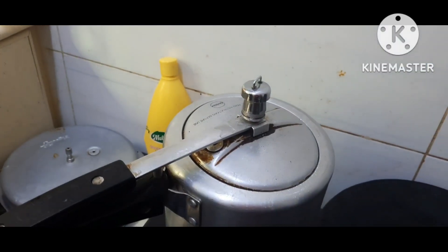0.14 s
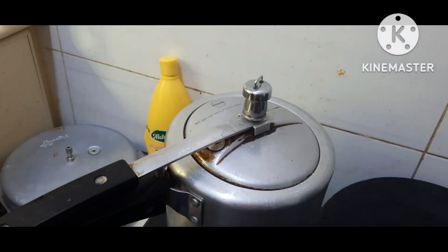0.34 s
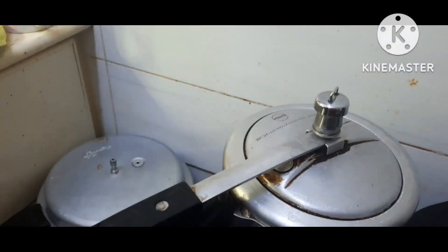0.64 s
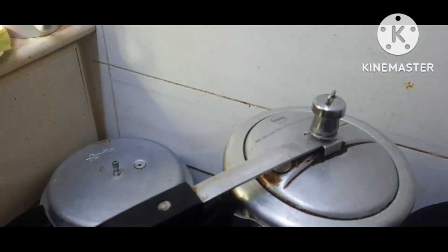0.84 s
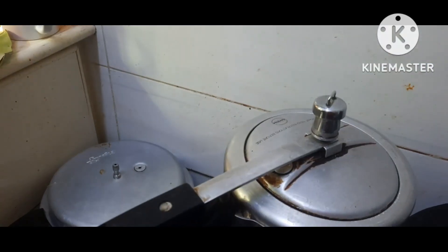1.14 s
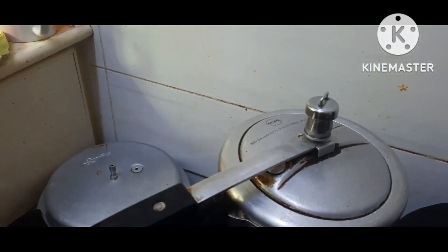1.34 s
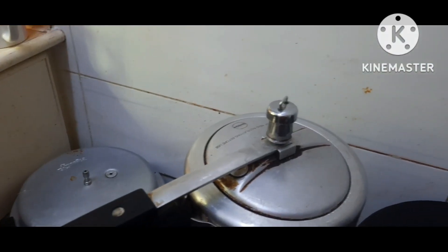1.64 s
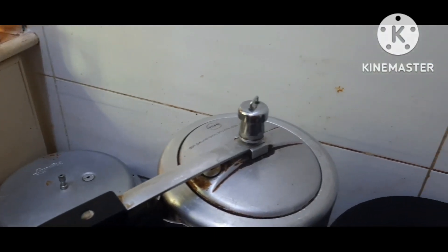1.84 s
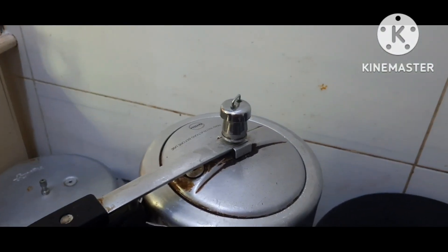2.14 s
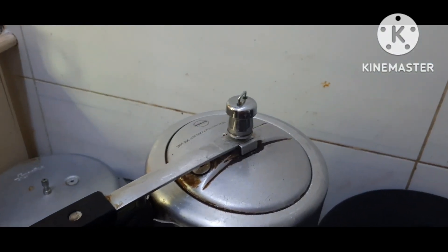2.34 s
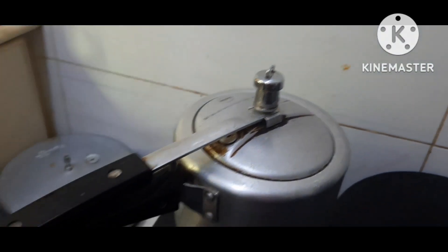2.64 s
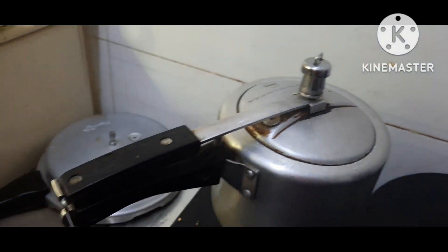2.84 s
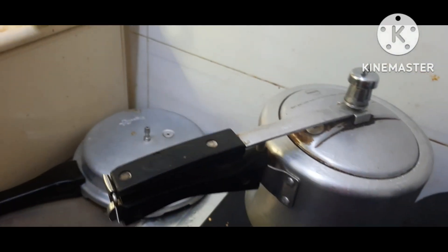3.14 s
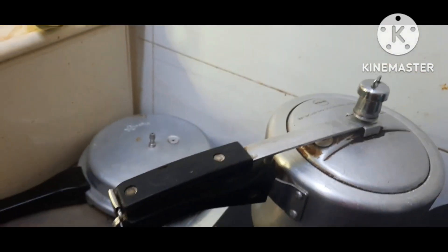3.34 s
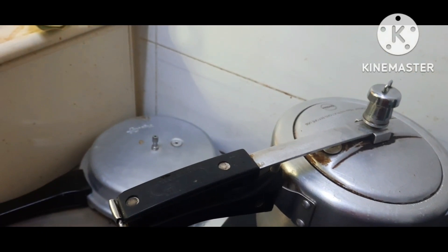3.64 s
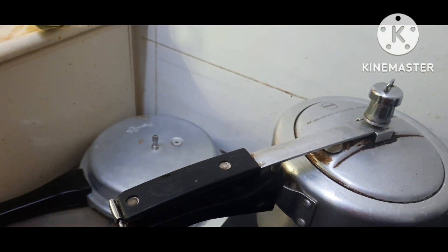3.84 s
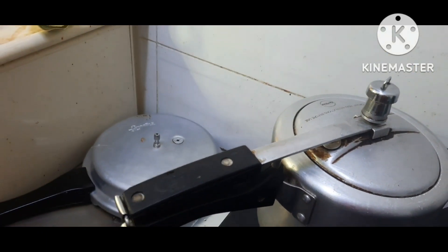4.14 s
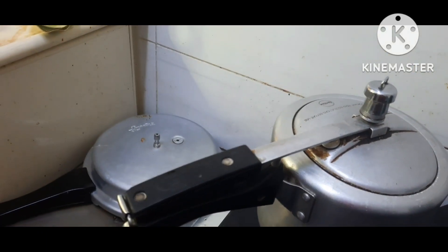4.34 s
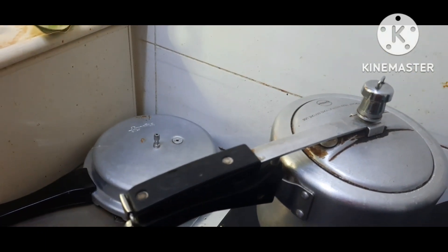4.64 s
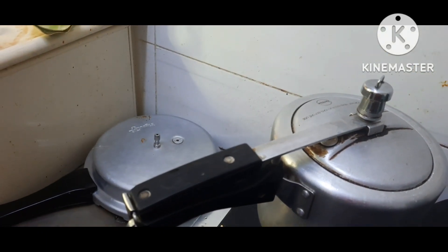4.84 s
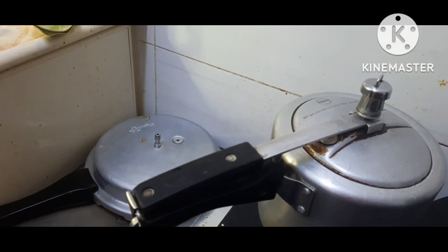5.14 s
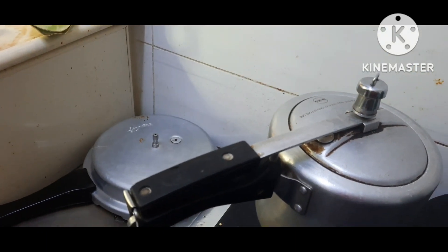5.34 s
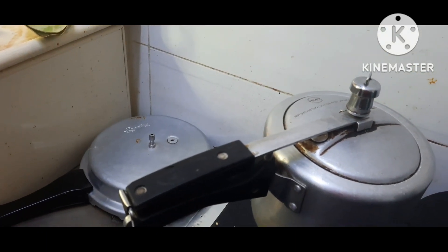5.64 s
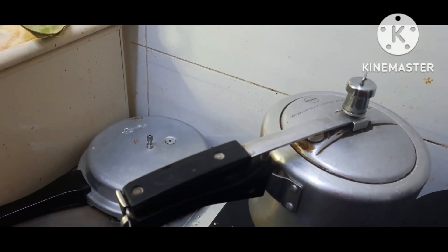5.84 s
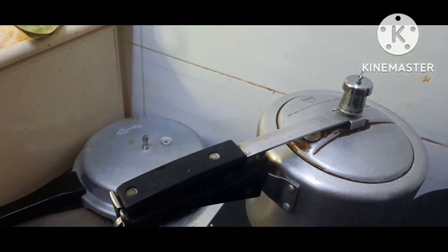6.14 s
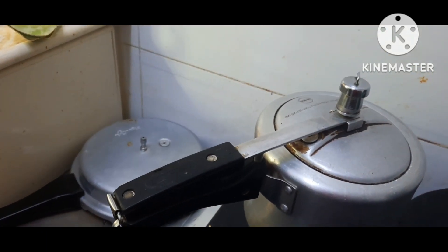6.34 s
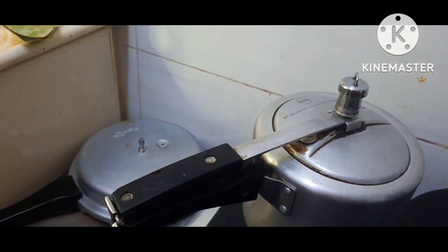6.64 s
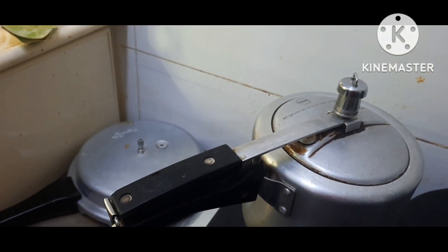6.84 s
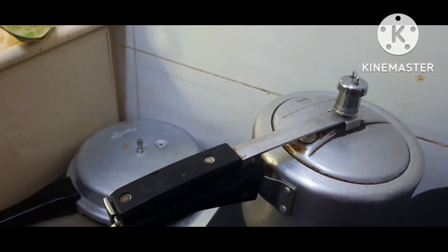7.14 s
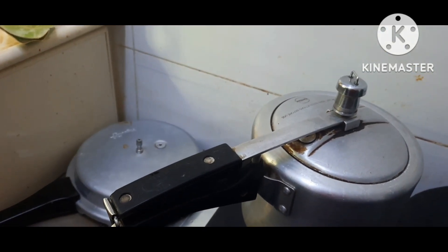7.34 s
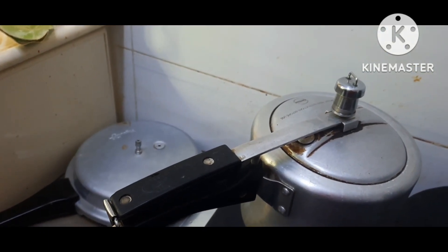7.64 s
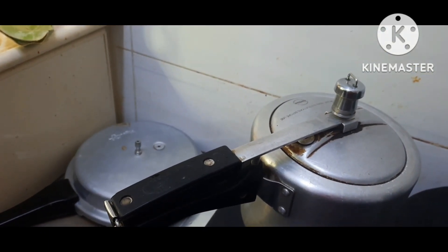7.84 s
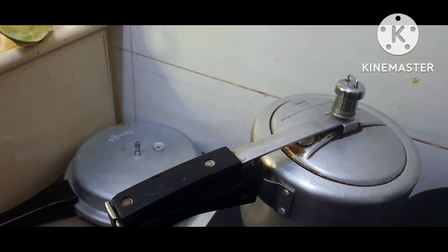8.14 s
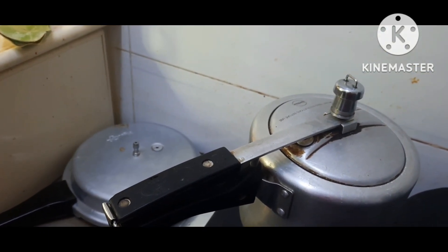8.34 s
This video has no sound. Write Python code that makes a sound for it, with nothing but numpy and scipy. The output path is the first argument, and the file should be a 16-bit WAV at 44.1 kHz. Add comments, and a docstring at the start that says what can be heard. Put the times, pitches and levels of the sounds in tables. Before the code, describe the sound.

A pressure cooker seeps faintly, then lets out a loud, throbbing steam hiss over the low roar of boiling in a tiled kitchen.

```python
"""Steam seeps faintly from a pressure cooker on a stove. Then the valve weight lifts and a jet hisses out,
throbbing as the weight rocks and spitting a few drops. Vent, lid and rim ring along; below them the
boil makes the hollow pot roar and hum. It is heard in a tiled kitchen, half a metre from a hand-held
phone whose two microphone ports colour the hiss differently, the left with a sharp peak."""
import sys
import numpy as np
from scipy import signal
from scipy.fft import rfft, irfft
from scipy.io import wavfile
from scipy.ndimage import uniform_filter1d

SR = 44100
rng = np.random.default_rng(int(sys.argv[2]) if len(sys.argv) > 2 else 0)


def wav_out(sig):
    """Save sig, one row per channel (or a flat mono array), as 16-bit PCM at SR to the path in sys.argv[1]."""
    wavfile.write(sys.argv[1], SR, np.round(np.clip(np.atleast_2d(sig).T, -1, 1) * 32767).astype(np.int16))


N = 374850
TIME = np.arange(N) / SR
LIFT_S = 1.1045  # the weight leaves its seat
SEEPING = TIME < LIFT_S
TURN_START_S, TURN_END_S = 2.5, 3.1  # the hand swings the phone round
TURNED = np.clip((TIME - TURN_START_S) / (TURN_END_S - TURN_START_S), 0, 1)


def undb(db):
    """Decibels to gain."""
    return 10 ** (np.asarray(db) / 20)


def unit(x):
    """Scale to rms 1."""
    return x / np.sqrt(np.mean(x ** 2))


def curves(*tables):
    """Interpolate each column over time; a second table takes over at the lift."""
    columns = [np.transpose(table) for table in tables]
    tracks = [[np.interp(TIME, times, column) for column in values] for times, *values in columns]
    return np.where(SEEPING, tracks[0], tracks[-1])


def swells(rows):
    """Gain curve of summed bell-shaped swells."""
    return sum(undb(db) * np.exp(-((TIME - centre_s) / half_s) ** 2) for centre_s, db, half_s in rows)


def walk(rate_hz):
    """Random steps, smoothed twice, rms 1."""
    hold = int(SR / rate_hz)
    steps = np.repeat(rng.standard_normal(N // hold + 1), hold)
    return unit(uniform_filter1d(uniform_filter1d(steps, hold), hold)[:N])


def colour(x, points):
    """Filter by a spectrum of (Hz, dB) points."""
    hz, db = np.transpose(points)
    log_f = np.log(np.arange(1, N // 2 + 2) * SR / N)
    return irfft(rfft(x) * undb(np.interp(log_f, np.log(hz), db, left=-90)), N)


def resonate(x, modes):
    """Filter by a bank of steep resonances."""
    f = np.arange(1, N // 2 + 2) * SR / N
    power = sum(undb(2 * db) / (1 + ((f ** 2 - hz ** 2) / (f * width)) ** 2) ** 2
                for hz, width, db in modes)
    return irfft(rfft(x) * np.sqrt(power), N)


def port_noise(correlation):
    """White noise at the left and right ports."""
    mid, side = rng.standard_normal((2, N))
    return (np.sqrt(1 + correlation) * mid + np.sqrt(1 - correlation) * np.array([side, -side])) / 2 ** .5


def ringing(modes, correlation):
    """Noise-driven resonances at both ports, rms 1."""
    return unit(resonate(port_noise(correlation), modes))


def tiles(x, t60_s=.086, echo_db=-2, sway_s=.05):
    """Direct sound plus dense echoes off pots and tiles, unrelated per port, renewed as the hand sways."""
    t = np.arange(SR // 11) / SR
    decay = np.exp(-np.log(1000) * t / t60_s) * (t > .001)
    decay *= undb(echo_db) / np.sqrt(np.sum(decay ** 2))
    hop = int(sway_s * SR)
    window = np.sin(np.pi * np.arange(2 * hop) / (2 * hop))
    padded = np.pad(x, ((0, 0), (hop, 2 * hop)))
    echoes = np.zeros((2, N + 4 * hop + len(t)))
    for i in range(0, N + hop, hop):
        response = decay * rng.standard_normal((2, len(t)))
        echo = signal.fftconvolve(padded[:, i:i + 2 * hop] * window, response, axes=1)
        echoes[:, i:i + echo.shape[1]] += echo
    left = np.where(TURNED < .5, x[0], np.roll(x[0], 4))  # further off once turned
    return (np.array([left, x[1]]) + echoes[:, hop:hop + N]) / np.sqrt(1 + undb(2 * echo_db))


# Low room resonances. Each row: centre in Hz, width in Hz, gain in dB.
KITCHEN_MODES = [(86, 58, -20), (125.6, 33, 1.5), (158, 73, -4.5)]


def kitchen_rumble(roar_db):
    """The room rumbles beneath the boil, partly following its level."""
    return undb(.67 * roar_db - 28.5 + 1.2 * walk(4.1)) * ringing(KITCHEN_MODES, correlation=1)


# Thuds at the phone. Each row: centre in seconds, level in dB, half length in seconds.
THUD_SWELLS = [(1.62, -68, 0.08), (1.99, -57, 0.11), (4.24, -74, 0.1), (5.55, -72, .2), (6.55, -65, .08),
               (6.82, -67, .1), (7.65, -70, .12)]
# Their spectrum. Each row: centre in Hz, width in Hz, gain in dB.
THUD_MODES = [(30, 20, -15), (55, 21, 2)]


def handling(floor_db=-75):
    """The hand on the phone makes a faint rumble and soft thuds."""
    return (undb(floor_db + 3.2 * walk(4.25)) + swells(THUD_SWELLS)) * ringing(THUD_MODES, correlation=.75)


# The pot's lowest resonance. Each row: centre in Hz, width in Hz, gain in dB.
HUM_MODE = [(92.2, 41, 0)]
# Booms. Each row: centre in seconds, level in dB, half length in seconds.
BOOM_SWELLS = [(.13, -67, .07), (1.27, -55.5, 0.13), (1.62, -59, 0.11), (1.9, -49.5, 0.07),
               (2.05, -60, 0.098), (2.43, -53, 0.068), (3.2, -60, .1), (3.49, -55, 0.063),
               (4.73, -56, 0.065), (5.2, -62, 0.16), (5.55, -63, 0.14), (6.45, -66, .1), (8.12, -62, .06)]


def pot_hum(hum_db=-68, seep_cut_db=5, waver_db=3.5, boom_hz=93.2):
    """The pot hums on its lowest note and booms briefly on it."""
    level_db = hum_db - seep_cut_db * SEEPING + waver_db * walk(4.63)
    hum = undb(level_db) * ringing(HUM_MODE, correlation=.88)
    pitch_hz = boom_hz * (1 + .03 * walk(20))
    note = np.sqrt(2) * np.sin(2 * np.pi * np.cumsum(pitch_hz) / SR)
    return hum + swells(BOOM_SWELLS) * note


# Strength of the boil. Each row: time in seconds, level in dB.
BOIL_LEVEL = [(0.0, -68), (0.2, -61), (0.45, -59), (0.55, -62), (0.65, -60.5), (0.95, -66.5), (1.5, -61.5),
              (1.7, -60.5), (1.9, -53), (2.2, -49), (2.9, -50.5), (3.2, -47), (3.65, -51.5), (4.3, -50.5),
              (4.8, -49.5), (5.75, -51.5), (6.5, -51), (6.95, -52), (7.9, -52.5), (8.5, -53)]
# Pot resonances. Each row: centre in Hz, width in Hz, gain in dB.
SIMMER_MODES = [(208, 120, -2), (310, 270, 2), (430, 140, -3.5), (616, 220, -13)]
ROAR_MODES = [(204, 37, -9), (245, 56, -3), (307, 16, 4), (285, 55, -8), (342, 33, 1), (400, 46, -6.5),
              (442.6, 44, -2.5), (544, 350, -10)]
MOAN_MODE = [(233.4, 35, 0)]
# One ring swells alone. Each row: centre in seconds, level in dB, half length in seconds.
MOAN_SWELLS = [(0.72, -68, .08), (3.45, -59, .12), (5.2, -56.5, .2), (6.6, -54, 0.27), (7.9, -60, 0.55)]


def boil(flutter_db=1.24):
    """Boiling drives the hollow pot's low resonances, which sharpen as it gets louder."""
    roar_db, = curves(BOIL_LEVEL)
    vigour = np.clip((roar_db + 61) / 7.1, 0, 1)
    roar = np.sqrt(vigour) * ringing(ROAR_MODES, correlation=.75)
    simmer = np.sqrt(1 - vigour) * ringing(SIMMER_MODES, correlation=.7)
    gain = undb(roar_db + flutter_db * walk(16))
    moan = swells(MOAN_SWELLS) * ringing(MOAN_MODE, correlation=.87)
    return (gain * (roar + simmer) + moan) * undb([[1.5], [-1.5]])


# Pot body resonances. Each row: centre in Hz, width in Hz, gain in dB.
BODY_MODES = [(700, 200, -3), (820, 340, 0), (1137, 740, 3)]
THIN_RING_MODE = [(689, 24, 0)]
# The thin ring fades as the boil settles. Each row: time in seconds, level in dB.
THIN_RING_LEVEL = [(1.8, -90), (2.2, -64), (3.9, -60.5), (5.2, -66), (6.2, -74), (8.5, -70)]


def pot_body(body_db, throb_db):
    """The body rings broadly with the steam and partly follows its throb; one thin ring stands out."""
    broad = undb(body_db + .54 * throb_db + .93 * walk(9)) * ringing(BODY_MODES, correlation=.27)
    thin = undb(curves(THIN_RING_LEVEL)[0]) * ringing(THIN_RING_MODE, correlation=.41)
    return (broad + thin) * undb([[2.5], [.1]])


# Vent chirps. Each row: start in seconds, length in seconds, start and end pitch in Hz, level in dB.
VENT_CHIRPS = [(.4, .13, 450, 335, -61), (1.11, 0.034, 1640, 1560, -47), (3.443, 0.037, 1200, 1360, -48),
               (3.477, 0.023, 1380, 1350, -49), (3.522, 0.041, 1016, 1016, -52),
               (3.525, .04, 1220, 1220, -53), (4.23, 0.03, 1676, 1840, -42.5),
               (6.362, .035, 1090, 1110, -47), (6.362, 0.084, 1250, 1190, -45),
               (8.176, .025, 1320, 1410, -46.5), (8.304, 0.047, 1730, 1690, -40.5)]


def vent_chirps(pitch_waver=.02):
    """The vent gives brief rough tones that waver in level and pitch."""
    out, waver = np.zeros(N), walk(250)
    for start_s, length_s, start_hz, end_hz, db in VENT_CHIRPS:
        i, n = int(start_s * SR), int(length_s * SR)
        hz = np.linspace(start_hz, end_hz, n) * (1 + pitch_waver * waver[i:i + n])
        out[i:i + n] += undb(db) * np.sqrt(2 * np.hanning(n)) * np.sin(2 * np.pi * np.cumsum(hz) / SR)
    return out * undb(3.4 * walk(90)) * undb([[1.5], [-1.5]])


def turbulence(flutter_db, flutter_hz, correlation, drops_per_s=500, spray_db=-22):
    """Eddies flutter the noise, droplets crackle; the plume is wide, so each port hears other eddies."""
    hits = rng.random(N) < drops_per_s / SR
    drops = hits * undb(1.6 * rng.exponential(size=N)) * rng.standard_normal(N)
    return undb(flutter_db * walk(flutter_hz)) * port_noise(correlation) + undb(spray_db) * unit(drops)


# Resonances of the cooker's top. Each row: centre in Hz, width in Hz, gain in dB.
VENT_MODES = [(1578, 255, -1.5), (1695, 52, 2.5), (1824, 470, -3), (1933, 95, 1)]
LID_MODES = [(2230, 600, -3), (2746, 546, 3)]
RIM_MODES = [(3490, 310, 1.5), (3820, 470, 3), (4434, 380, -0.5), (4790, 440, -2.5)]


def lid_rings(vent_db, lid_db, rim_db, throb_db, drift_db=1, flicker_db=2):
    """Gusts of steam ring the vent tube, lid and rim, which partly follow the throb."""
    gusts = turbulence(flutter_db=1, flutter_hz=60, correlation=.59)
    vent = resonate(gusts, VENT_MODES)
    lid = sum(undb(drift_db * walk(3)) * resonate(gusts, [mode]) for mode in LID_MODES)
    rim = sum(undb(flicker_db * walk(9)) * resonate(gusts, RIM_MODES[k::2]) for k in range(2))
    rings = undb(vent_db) * unit(vent) + undb(lid_db) * unit(lid) + undb(rim_db) * unit(rim)
    return tiles(undb(.52 * throb_db) * rings) * undb([[2.9], [.9]])


# Spat drops. Each row: start in seconds, level before filtering in dB, rise and T60 in seconds.
SPAT_DROPS = [(0.34, -39, .008, .06), (0.653, -24.5, 0.00032, .006), (0.6565, -43, .001, 0.074),
              (1.103, -41, 0.00018, 0.047), (1.496, -30, .0003, 0.0034), (3.441, -15.5, 0.006, 0.27),
              (7.283, -14, .0005, 0.0068)]
# Their spectrum: bright, with a dip near 11 kHz. Each row: frequency in Hz, gain in dB.
SPIT_SPECTRUM = [(4000, -10), (8500, -3.5), (11000, -24), (16000, -3)]


def spits():
    """Each water drop spat from the vent is a quick burst of noise that dies away."""
    envelope = 0
    for start_s, db, rise_s, t60_s in SPAT_DROPS:
        t = np.clip(TIME - start_s, 0, None)
        envelope += undb(db) * np.clip(t / rise_s, 0, 1) * np.exp(-np.log(1000) * t / t60_s)
    return colour(envelope * rng.standard_normal(N), SPIT_SPECTRUM)


# Bouts of rocking. Each row: start, end, fade and time of one puff in seconds, rate at that puff in Hz,
# slowing in Hz per second, depth 0-1, lean towards a quick rise 0-1.
ROCKING_BOUTS = [(1.55, 2.64, 0.29, 2.056, 10, 0.032, 0.18, 0.1),
                 (3.5, 5.56, 0.4, 4.19, 3.21, -0.18, 0.12, 0.87),
                 (5.403, 7.782, 0.68, 6.588, 6.193, 1.12, 0.43, 0.0)]


def rocking_db():
    """The rocking weight opens and narrows the gap: round puffs with sharp dips between."""
    gap = 1
    for start_s, end_s, fade_s, puff_s, hz, slowing, depth, lean in ROCKING_BOUTS:
        swing = depth * np.clip(np.minimum(TIME - start_s, end_s - TIME) / fade_s, 0, 1)
        t = TIME - puff_s
        phase = 2 * np.pi * (hz * t - .5 * slowing * t ** 2)
        gap += swing * np.cos(phase + lean * np.cos(phase))
    return 20 * np.log10(np.clip(gap, .1, None))


# Narrow rings of the weight's cap. Each row: centre in Hz, width in Hz, gain in dB.
CAP_MODES = [(5760, 47, -8), (7130, 56, -9), (7900, 54, -7), (11700, 160, -5), (14540, 120, -9)]
# Hiss spectrum at each port. Each row: frequency in Hz, gain in dB.
HISS_LEFT = [(4000, -15), (5000, -16.5), (5600, -8.5), (6300, -7), (7200, -1), (7600, 0), (7950, 2),
             (8350, -5), (8800, -11), (9600, -15.5), (10600, -14), (11700, -13.5), (13000, -12),
             (14000, -13.5), (14700, -9.5), (15400, -11)]
HISS_RIGHT = [(3900, -25), (4200, -18.5), (5000, -11), (5600, -13.5), (6300, -8.5), (7200, -10.5),
              (8000, -12.5), (8800, -11), (9600, -7), (10600, -5), (11700, -4), (12500, -6.5), (13500, -6),
              (14600, -6.5), (15400, -3)]


def valve_hiss(flow_db, balance_db):
    """Turbulent steam and spat drops leave the valve and ring the weight's cap."""
    plume = undb(flow_db) * turbulence(flutter_db=.44, flutter_hz=150, correlation=.083)
    jet = tiles(plume + spits())
    jet += resonate(jet, CAP_MODES)
    filter_rms = np.sqrt(np.mean(colour(rng.standard_normal(N), HISS_LEFT) ** 2))
    hiss = np.array([colour(jet[0], HISS_LEFT), colour(jet[1], HISS_RIGHT)]) / filter_rms
    return hiss * undb(3.5 + .5 * np.array([balance_db, -balance_db]))


# Steam flow before and after the lift. Each row: time in seconds, hiss level in dB.
SEEP_FLOW = [(0.0, -54.5), (0.35, -52), (0.6, -53), (0.75, -52), (1.08, -52.5)]
JET_FLOW = [(1.12, -34.5), (1.17, -36.5), (1.35, -34), (1.53, -35), (1.62, -32.5), (2.05, -33.5),
            (2.33, -31.5), (2.55, -32.5), (3.0, -32), (3.28, -31.5), (3.33, -33.5), (3.44, -33),
            (3.7, -31.5), (4.15, -30.5), (4.95, -30.5), (5.1, -28), (5.35, -29.5), (6.0, -29.5),
            (6.13, -28), (6.45, -29.5), (6.9, -28), (7.2, -29), (7.3, -28), (7.53, -31), (7.7, -29.2),
            (8.15, -27.5), (8.5, -29.5)]
# Ringing and balance. Each row: time in seconds, then body, vent, lid, rim, left minus right hiss in dB.
SEEP_RINGS = [(0.05, -71.5, -73.5, -71.5, -73, 4), (0.7, -70.5, -69, -68, -67.5, 4),
              (1.08, -67.5, -66, -67.5, -73, 5.5)]
JET_RINGS = [(1.12, -57, -50, -50, -51, 2), (1.19, -57.5, -48.5, -52.5, -49.5, -1),
             (1.3, -55, -51, -49, -49, 1), (1.8, -58.5, -49.5, -48, -47.5, 3),
             (1.9, -53, -49.5, -47.5, -49, 3.5), (2.25, -52.5, -50.5, -47, -50, 2),
             (2.8, -51.5, -52, -45.5, -48.5, 3), (3.35, -51, -52.5, -47.5, -47.5, 1),
             (3.5, -49.5, -48.5, -46, -49, 1.5), (3.65, -51, -53.5, -47, -48, 1.5),
             (4.3, -52, -50.5, -47, -49, -0.5), (5.0, -50, -50, -46, -45.5, 0),
             (6.3, -50, -48, -44.5, -43, 0.5), (7.4, -50, -46.5, -44.5, -42.5, 1.5),
             (8.45, -50, -48.5, -44.5, -41.5, 1.5)]
# Colour at each port as the phone is aimed before the lift (seep) and before the turn (jet).
# Each row: frequency in Hz, gain in dB.
SEEP_EQ_LEFT = [(100, -1), (3000, -2), (4500, 2), (5800, -1.5), (7300, 1.5), (8200, -2.5), (9400, -4),
                (10100, -6), (11300, -4), (12200, -2), (14000, -2), (15400, 0)]
SEEP_EQ_RIGHT = [(100, 0), (1800, -1), (3200, -6), (3700, 1), (5000, 3), (7000, 1.5), (9000, -2),
                 (11500, 0.5), (12700, 2), (13600, 0), (15400, -1)]
UNTURNED_EQ_LEFT = [(100, 4), (1800, 0), (2600, -2.5), (4500, -1.5), (5700, -1.5), (7400, 1), (9000, -1.5),
                    (10800, -1.5), (12400, 3), (13600, 1.5), (14800, 4), (15400, 2)]
UNTURNED_EQ_RIGHT = [(100, 0), (3200, 0.56), (5000, -1.3), (9000, -.5), (10000, 1.2), (10800, -0.85),
                     (12200, 1.7), (13200, -1), (15400, -2)]


def steam(drift_db=.5):
    """Steam seeps, then jets once the weight lifts; its colour shifts as the phone turns."""
    throb_db = rocking_db() + drift_db * walk(12)
    flow_db, = curves(SEEP_FLOW, JET_FLOW)
    body_db, vent_db, lid_db, rim_db, balance_db = curves(SEEP_RINGS, JET_RINGS)
    bright = valve_hiss(flow_db + throb_db, balance_db) + lid_rings(vent_db, lid_db, rim_db, throb_db)
    left, right = bright
    seep = np.array([colour(left * SEEPING, SEEP_EQ_LEFT), colour(right * SEEPING, SEEP_EQ_RIGHT)])
    unturned = np.array([colour(left, UNTURNED_EQ_LEFT), colour(right, UNTURNED_EQ_RIGHT)])
    jet = (TURNED * bright + (1 - TURNED) * unturned) * ~SEEPING
    return seep + jet + pot_body(body_db, throb_db)


def scene():
    """Everything that reaches the two ports."""
    cooker = steam() + vent_chirps() + boil()
    lows = pot_hum() + kitchen_rumble(curves(BOIL_LEVEL)[0]) + handling()
    return cooker + lows * undb([[2.3], [-2.3]])


def record(dry):
    """The phone cuts the top treble steeply."""
    cutoff_hz = 15490
    return signal.sosfilt(signal.ellip(14, .3, 62, cutoff_hz, fs=SR, output="sos"), dry)


dry = scene()
out = record(dry)
wav_out(out)
```